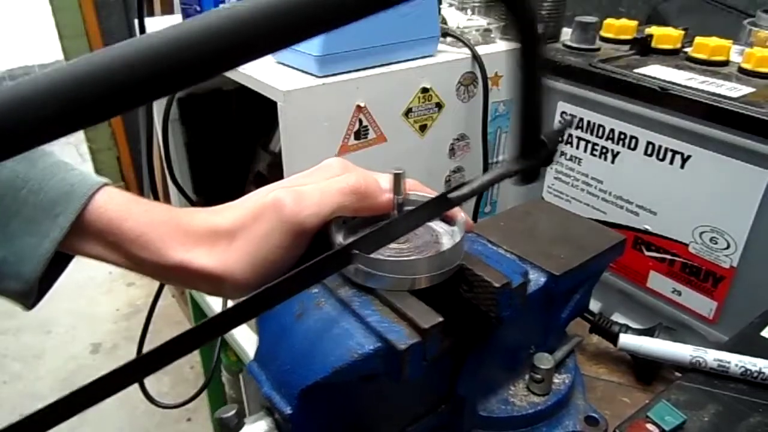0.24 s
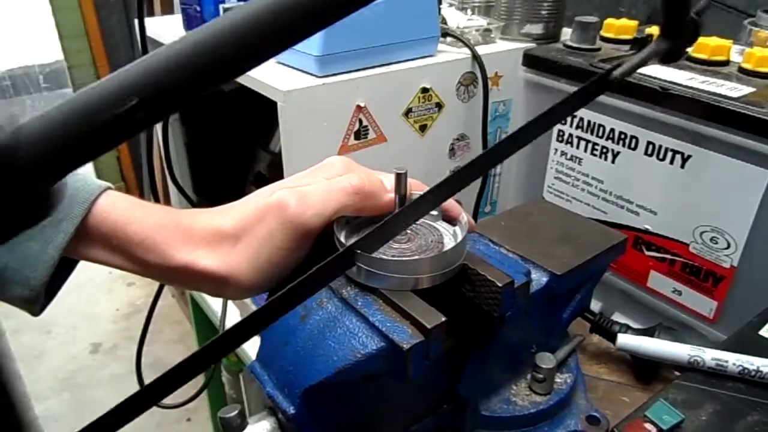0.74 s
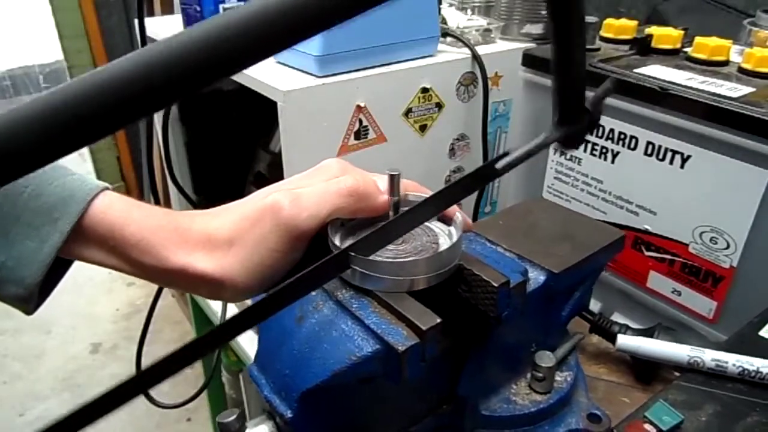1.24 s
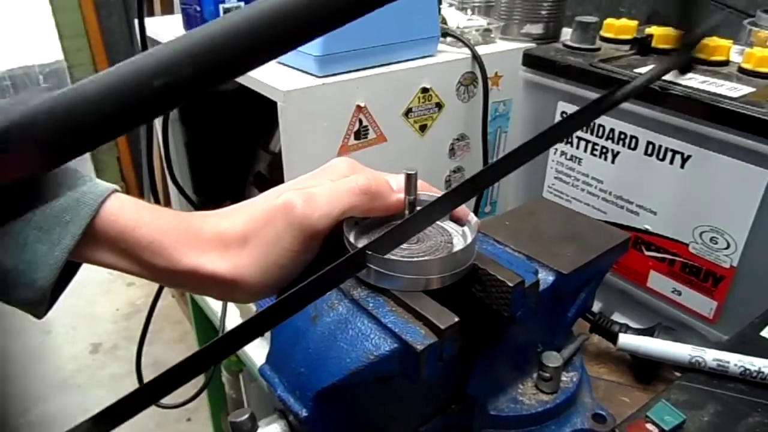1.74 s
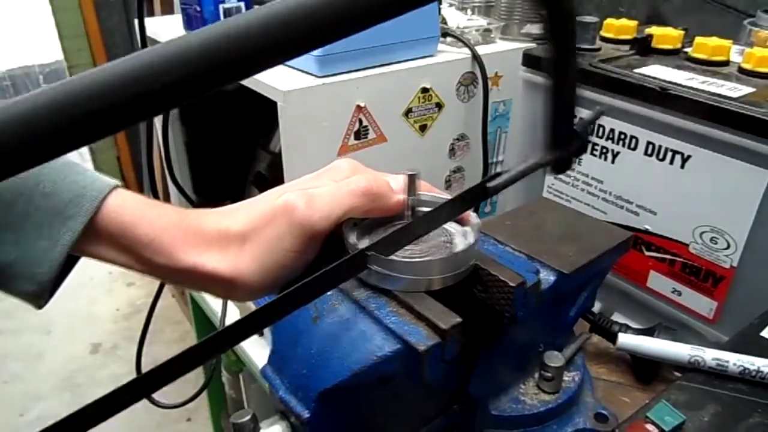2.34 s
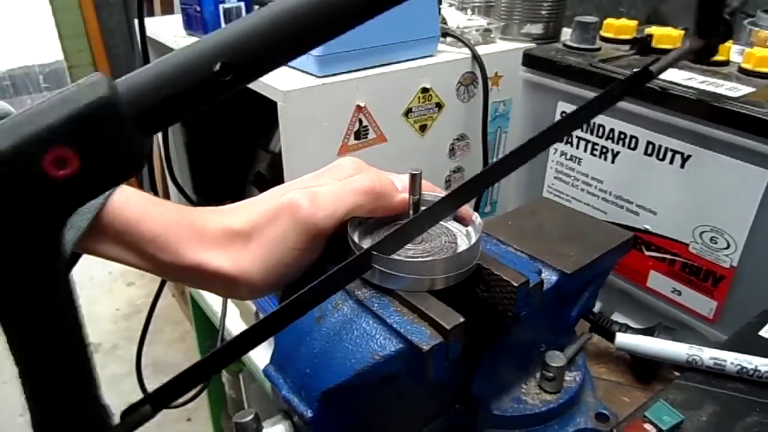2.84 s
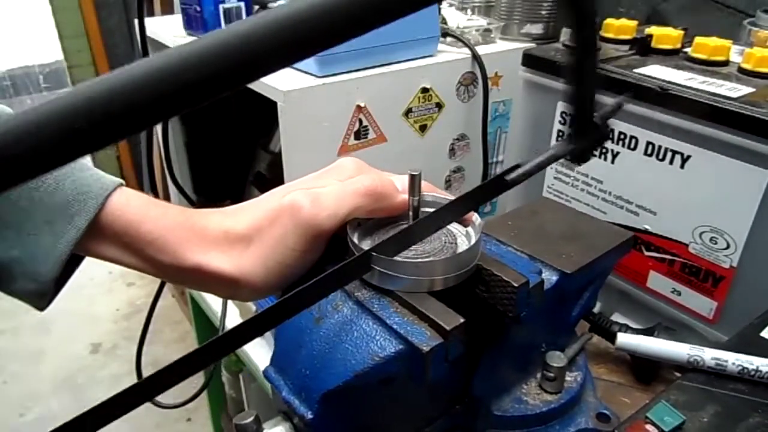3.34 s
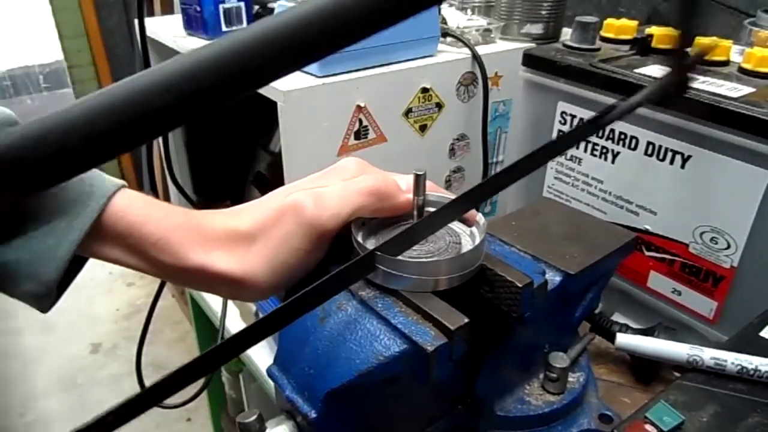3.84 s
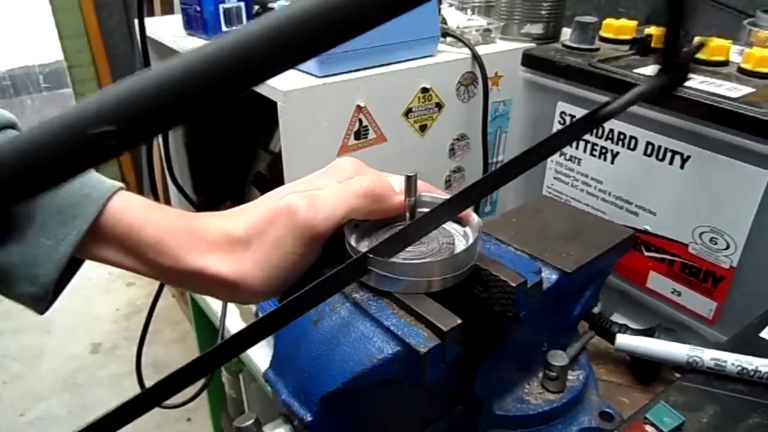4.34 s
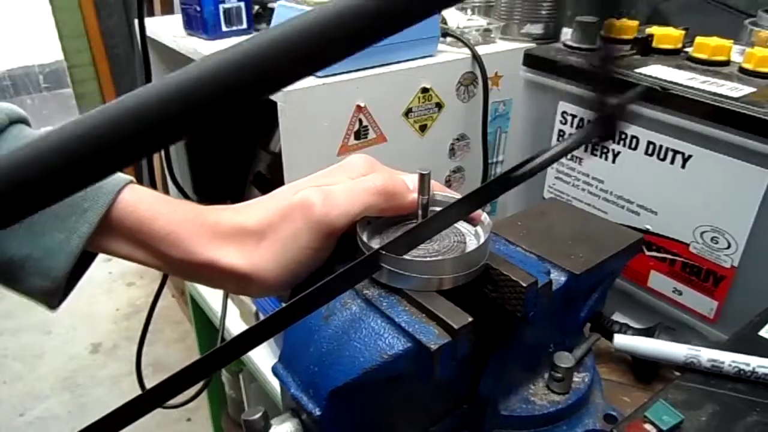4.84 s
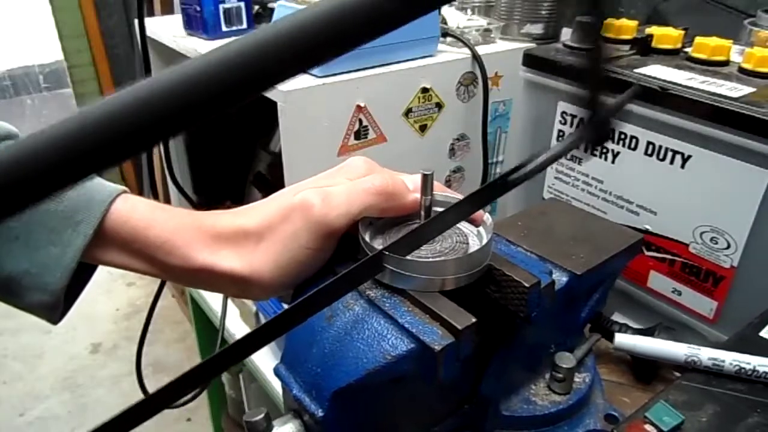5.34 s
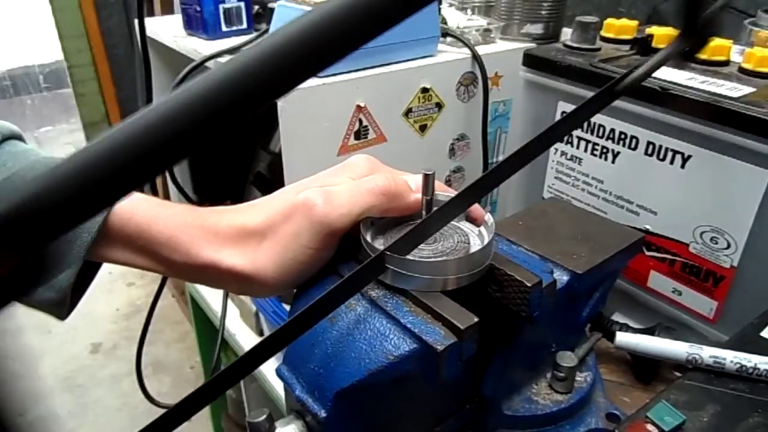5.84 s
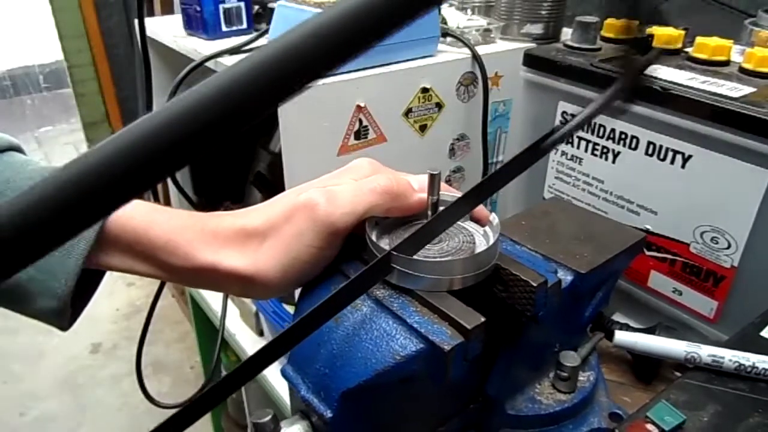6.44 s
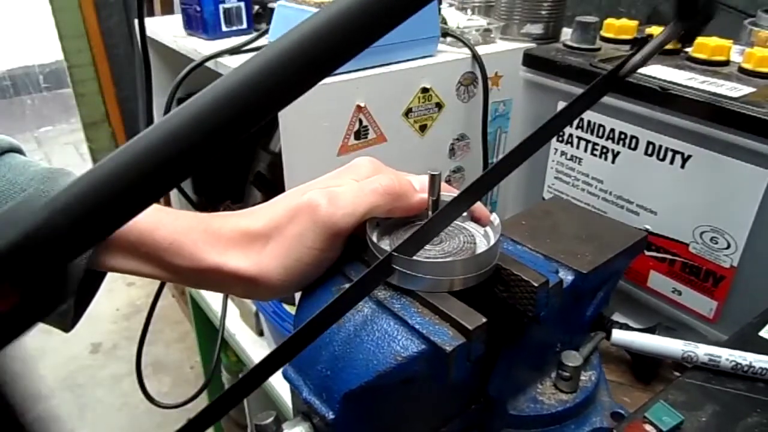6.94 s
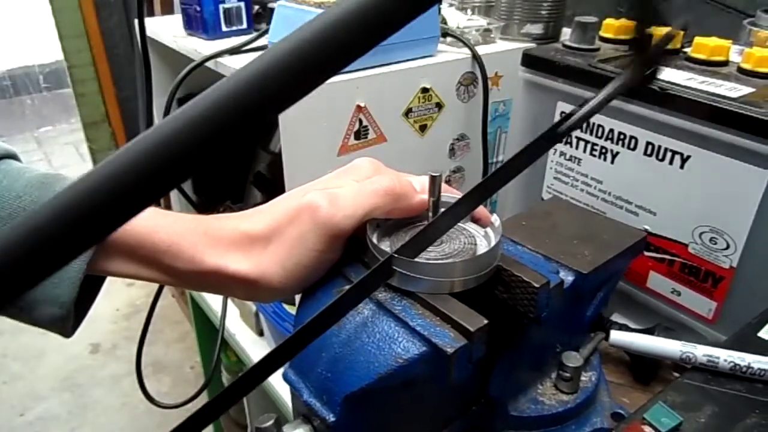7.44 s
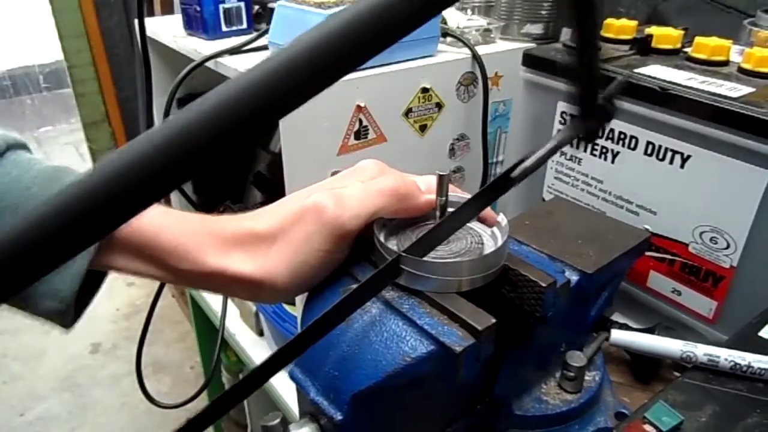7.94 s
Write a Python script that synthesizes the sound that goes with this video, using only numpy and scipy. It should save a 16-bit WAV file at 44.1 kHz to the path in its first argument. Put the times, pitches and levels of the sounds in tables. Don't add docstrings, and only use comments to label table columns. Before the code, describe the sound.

Close, fast hacksawing on steel: gritty alternating strokes, a humming frame, squeaky singing blade and dull vise knocks over a low workshop rumble.

```python
import sys
import numpy as np
from scipy import signal
from scipy.fft import rfft, irfft, next_fast_len
from scipy.io import wavfile
from scipy.ndimage import uniform_filter1d

SR = 44100
rng = np.random.default_rng(int(sys.argv[2]) if len(sys.argv) > 2 else 0)


def put_to_file(sound):
    columns = np.atleast_2d(sound).T
    safe = np.clip(columns, -1, 1)
    whole_steps = np.round(safe * 32767)
    wavfile.write(sys.argv[1], SR, whole_steps.astype(np.int16))


def voltage_ratio(decibels):
    exponent = np.asarray(decibels, float) / 20
    return 10 ** exponent


N = 361179
TIME = np.arange(N) / SR
TEETH_PER_STROKE = 112


def evened(x):
    return x / np.sqrt(np.mean(x ** 2) + 1e-20)


def steadied(x, size, amount=1):
    return x / np.sqrt(uniform_filter1d(x ** 2, size)) ** amount


def coloured(x, points):
    hz, db = np.transpose(points)
    size = next_fast_len(len(x))
    bins = np.fft.rfftfreq(size, 1 / SR)
    gain = voltage_ratio(np.interp(np.log(bins + 1), np.log(hz), db, -100, -100))
    return irfft(rfft(x, size) * gain, size)[:len(x)]


def ring(x, hz, width):
    r = np.exp(-np.pi * width / SR)
    return evened(signal.lfilter([1, 0, -1], [1, -2 * r * np.cos(2 * np.pi * hz / SR), r * r], x))


def resonate(x, hz, width):
    turn = np.exp(2j * np.pi * np.cumsum(hz * np.ones(len(x))) / SR)
    r = np.exp(-np.pi * width / SR)
    smooth = signal.lfilter([1], [1, -r], x * turn.conj())
    return evened((turn * smooth).real)


def wander(hz):
    knots = evened(uniform_filter1d(rng.standard_normal(7000), size=3))
    return np.interp(TIME * hz, np.arange(7000) / 3, knots)


def swells(events):
    t = np.arange(0, N, 64) / SR
    s, db, length = np.transpose(events)[:, :, None]
    bells = voltage_ratio(db) * .5 ** ((2 * (t - s) / length) ** 2)
    return np.interp(TIME, t, np.max(bells, axis=0))


def holds(events):
    t = np.arange(0, N, 64) / SR
    start, length, db, hz = np.transpose(events)[:, :, None]
    middle = start + length / 2
    level = np.max(voltage_ratio(db) * .5 ** (abs(2 * (t - start) / length - 1) ** 5.1 * 2.433), axis=0)
    nearest = np.argmin(abs(t - middle) - length / 2, axis=0)
    pitch = uniform_filter1d(hz[nearest, 0], size=12)
    since = np.clip(t - middle[nearest, 0], -.04, .04)
    return np.interp(TIME, t, level), np.interp(TIME, t, pitch), np.interp(TIME, t, since)


# (turn [s], rasp [dB], strongest push [share of stroke], rasp at the turn [dB],
# blade and drum ring against the rasp [dB])
PULL_STROKES = [(0.0, -21, 0.58, -43.5, -6.5), (0.337, -20, 0.51, -47, -6.5), (0.67, -20, 0.51, -44, -5.5),
                (1.019, -18.5, 0.49, -38, -7), (1.361, -20.5, 0.59, -42.5, -5),
                (1.713, -19, 0.53, -46, -7.5), (2.069, -20, 0.57, -40.5, -6.5), (2.423, -20, 0.59, -48, -6),
                (2.775, -20, 0.61, -40, -6.5), (3.119, -19.5, 0.51, -43, -8), (3.467, -20, 0.59, -43, -6),
                (3.814, -19.5, 0.6, -50, -8), (4.166, -25, 0.57, -45, -6),
                (4.586, -22.5, 0.53, -66.5, -6.5), (5.001, -20.5, 0.45, -62.5, -11.5),
                (5.377, -19.5, 0.54, -45, -10), (5.735, -20.5, 0.49, -43.5, -7.5),
                (6.079, -20, 0.49, -44.5, -8), (6.443, -19.5, 0.52, -44, -7.5), (6.813, -21, 0.65, -45, -5),
                (7.184, -19, 0.56, -46, -13), (7.605, -23, 0.56, -45.5, -6), (7.992, -19, 0.49, -48.5, -14)]
PUSH_STROKES = [(0.172, -20.5, 0.62, -41, 0.5), (0.507, -19.5, 0.59, -47.5, -1.5),
                (0.838, -20.5, 0.49, -45, -2.5), (1.183, -20.0, 0.53, -48, 1.5),
                (1.538, -20.5, 0.59, -49, -2), (1.898, -20, 0.47, -50, -1), (2.252, -20, 0.53, -52.5, 1),
                (2.61, -19, 0.55, -49, 1), (2.956, -18.5, 0.56, -44.5, 0.5), (3.306, -18.5, 0.6, -45.5, -1),
                (3.643, -20, 0.57, -46.5, 2.5), (4.002, -21.5, 0.52, -49, 2.5),
                (4.362, -26.5, 0.61, -53, 4), (4.775, -21, 0.62, -48, 1), (5.186, -20.5, 0.68, -49.5, -1.5),
                (5.566, -20, 0.53, -46, -1.5), (5.913, -19.5, 0.58, -47.5, -3.5),
                (6.267, -19, 0.64, -45.5, -5), (6.634, -20.5, 0.55, -46.5, -3.5),
                (7.011, -20.5, 0.57, -49, -4.5), (7.382, -20, 0.65, -47.5, -5), (7.811, -20, 0.59, -48, -5)]


def strokes():
    return np.array(sorted(PULL_STROKES + PUSH_STROKES))


def along_strokes(values, shares):
    turns = np.append(strokes()[:, 0], N / SR)
    at = turns[:-1, None] + np.diff(turns)[:, None] * shares
    return np.interp(TIME, at.ravel(), np.ravel(values))


def ring_db(follow, arches, shares):
    rows = strokes()
    way = np.arange(len(rows)) % 2
    return along_strokes(follow * rows[:, 4:] + np.array(arches)[way], np.array(shares))


def travel():
    turns = np.append(strokes()[:, 0], N / SR)
    return .5 + .5 * np.cos(np.pi * np.interp(TIME, turns, np.arange(len(turns))))


def pressure_db():
    rows, share = strokes(), np.arange(24) / 24
    length = np.diff(rows[:, 0], append=N / SR)[:, None]
    stroke_db, top, turn_db = rows[:, 1:2], np.clip(rows[:, 2:3], .2, .8), rows[:, 3:4]
    rest = 0.0023 * np.maximum(-39.5 - turn_db, 0)
    late, early = 0.13 * rest / length, 0.87 * np.roll(rest, -1) / length
    moving = np.clip((share - late) / (1 - late - early), 0, 1)
    leaning = moving ** (np.log(.5) / np.log(top))
    arch = voltage_ratio(stroke_db) * abs(np.sin(np.pi * leaning)) ** 1.1
    fade = 410
    creep_db = np.minimum(turn_db + fade * share * length, np.roll(turn_db, -1) + fade * (1 - share) * length)
    creep = voltage_ratio(np.minimum(creep_db, stroke_db - 15))
    return along_strokes(20 * np.log10(np.hypot(arch, creep)), share)


def teeth(place):
    passed = np.cumsum(abs(np.gradient(place)) * (1 + .15 * wander(60)) + 2e-6) * TEETH_PER_STROKE
    count = np.maximum.accumulate(np.floor(passed + .08 * rng.standard_normal(N)))
    bites = (np.diff(count, prepend=0) > 0) * voltage_ratio(3.6 * rng.standard_normal(N))
    busy = np.sqrt(uniform_filter1d(bites ** 2, 900) + 1e-5)
    chips = rng.standard_normal(N)
    clumps = voltage_ratio(1.07 * wander(70) + 0.57 * wander(240))
    return evened((voltage_ratio(-5.5) * bites / busy + chips) * clumps)


# (time [s], level [dB])
BENCH_RUMBLE = [(0.0, -46), (0.98, -46), (1.19, -44.5), (2.12, -46), (3.01, -40.5), (3.65, -39.5),
                (4.08, -42), (4.63, -44), (4.93, -40.5), (5.41, -41), (6.59, -42.5), (8.05, -39.5),
                (8.19, -39)]
# (pitch [Hz], level [dB per Hz])
BENCH_COLOUR = [(12, -34), (25, -8.5), (55, 3.5), (85, 1.5), (167, -5.5), (212, -7), (392, -11.5),
                (600, -12), (780, -35), (1320, -120)]


def rumble(rasp_db):
    s, db = np.transpose(BENCH_RUMBLE)
    noise = evened(coloured(rng.standard_normal(N), BENCH_COLOUR))
    return voltage_ratio(np.interp(TIME, s, db) + 5.5 + 1.9 * wander(7.4) + 0.0095 * (rasp_db + 36)) * noise


# (pitch [Hz], level [dB per Hz])
AIR_COLOUR = [(290, -22), (500, -3.5), (760, -4.5), (917, -0.5), (1460, -10.5), (2600, -13), (15800, -74)]


def air():
    return voltage_ratio(-43.5) * evened(coloured(rng.standard_normal(N), AIR_COLOUR))


# (pitch [Hz], level [dB per Hz])
SCRAPE_COLOUR = [(590, -12), (1000, -14), (1400, -19.5), (1570, -8), (2410, -12), (2770, -2.5),
                 (3290, -8.5), (6450, -6.5), (9020, -12.5), (14200, -4.5), (15900, -26)]
# (pitch [Hz], width [Hz], level [dB])
STEEL_RINGS = [(3630, 120, -12.5), (4445, 85, -9), (5236, 100, -8.5), (6280, 110, -7), (6510, 90, -7.5),
               (6745, 80, -12.5), (8211, 55, -15.5), (5400, 130, -11), (14450, 600, -5)]


def rasp(drive, place, rasp_db):
    z = signal.stft(coloured(drive, SCRAPE_COLOUR), SR, nperseg=512)[2]
    patches = uniform_filter1d(rng.standard_normal(z.shape), 6, 0)
    patches = evened(uniform_filter1d(patches, 5, 1))
    broad = evened(signal.istft(z * voltage_ratio(3 * patches), SR, nperseg=512)[1][:N])
    rings = sum(voltage_ratio(db + 3.7 * wander(8.6)) * ring(drive, hz, width) for hz, width, db in STEEL_RINGS)
    pulling = uniform_filter1d(1. * (np.gradient(place) < 0), size=800)
    return voltage_ratio(rasp_db) * (voltage_ratio(-1) * broad + voltage_ratio(-13.5 + 4 * pulling) * rings)


# (pitch drawn back [Hz], midway [Hz], pushed out [Hz], width [Hz],
# level drawn back [dB], pushed out [dB])
BLADE_RINGS = [(2160, 2170, 2230, 84, 8.5, 1), (2110, 2755, 3060, 105, 23.5, -6),
               (564, 962, 1980, 87, 5.5, 1), (1860, 1880, 1763, 23, -6, -3.5),
               (1390, 1000, 1160, 520, -64, 10), (1650, 5800, 3550, 730, -47, 8.5)]
# (level early [dB], late [dB])
BLADE_ARCHES = [(-2.5, -1.5), (-6.5, -1.5)]


def blade(drive, place, rasp_db):
    out = 0
    for back_hz, mid_hz, out_hz, width, back_db, out_db in BLADE_RINGS:
        hz = np.interp(place, [0, .5, 1], [back_hz, mid_hz, out_hz])
        level = voltage_ratio(back_db + (out_db - back_db) * place + 6.1 * wander(15))
        out = out + level * resonate(drive, hz, width)
    level_db = 1.01 * (rasp_db + 21) - 25.5 + ring_db(1, BLADE_ARCHES, [.3, .7])
    return voltage_ratio(level_db) * steadied(out, 3000)


# (start [s], length [s], level [dB], pitch [Hz])
FRAME_HUMS = [(0.094, 0.041, -29, 906), (0.385, 0.098, -27, 877), (0.565, 0.046, -28, 941),
              (0.725, 0.07, -23, 900), (0.906, 0.055, -30, 894.2), (1.06, 0.065, -17, 880),
              (1.429, 0.085, -24, 888.1), (1.771, 0.067, -26, 885), (1.94, 0.034, -26.5, 893),
              (2.136, 0.11, -21.5, 884), (2.5, 0.04, -28.5, 885), (2.54, 0.048, -23, 891),
              (2.658, 0.047, -27, 902), (2.85, 0.11, -19.5, 878), (3.009, 0.05, -24.5, 893),
              (3.192, 0.048, -21, 887), (3.243, 0.054, -26, 883), (3.389, 0.057, -26.5, 896),
              (3.886, 0.066, -23, 902.1), (4.06, 0.047, -25, 912), (4.29, 0.05, -37, 888),
              (4.408, 0.043, -32, 885), (4.48, 0.052, -33, 890), (4.702, 0.03, -29.5, 874),
              (5.08, 0.029, -25, 899), (5.268, 0.069, -25, 893), (5.474, 0.087, -25.5, 893),
              (5.628, 0.068, -29, 894), (5.801, 0.08, -33, 898), (5.968, 0.04, -30, 890),
              (6.153, 0.055, -26, 886), (6.336, 0.044, -31.5, 902), (6.52, 0.022, -24, 899),
              (6.543, 0.024, -17.5, 925), (6.926, 0.074, -26, 893), (7.079, 0.067, -31, 915),
              (7.23, 0.042, -30, 881), (7.275, 0.033, -18.5, 891), (7.31, 0.052, -25, 889),
              (7.485, 0.055, -22.5, 885), (8.036, 0.038, -29, 881.5), (8.075, 0.11, -24, 886.5)]


def frame(drive, rasp_db):
    burst, pitch, since = holds(FRAME_HUMS)
    burst = burst * voltage_ratio(-50 * since)
    idle = voltage_ratio(-38.5 + 0.53 * (rasp_db + 22) + 2.2 * wander(22))
    hz = 886 + 4 * wander(4.6)
    hz = hz + (pitch - hz) * burst / (burst + idle)
    phase = 2 * np.pi * np.cumsum(hz + 8 * wander(30)) / SR
    hum = np.sqrt(2) * np.sin(phase) * voltage_ratio(1.3 * wander(60))
    shaken = ring(ring(drive, 917, 68), 878, 120)
    return np.hypot(voltage_ratio(-1) * burst, idle) * hum + (voltage_ratio(-11) * burst + voltage_ratio(-3) * idle) * shaken


def tooth_tone(drive, place, rasp_db):
    rate_hz = uniform_filter1d(abs(np.gradient(place)), 400) * SR * TEETH_PER_STROKE
    tone = resonate(resonate(drive, rate_hz, 63), rate_hz, 210)
    return voltage_ratio(rasp_db - 24.5 + 1.6 * wander(9)) * tone * np.clip(rate_hz / 500, 0, 1)


def ring_cluster(drive, modes, level, steady, sway_db):
    out = 0
    for hz, width, db in modes:
        out = out + voltage_ratio(db + sway_db * wander(16)) * ring(ring(drive, hz, width), hz, 4 * width)
    return level * steadied(evened(out), 1200, steady)


# (pitch [Hz], width [Hz], level [dB])
DRUM_RINGS = [(2800, 64, 3.5), (2688, 86, -6.5), (2977, 68, -5.5), (2540, 25, -11.5)]
# (level early [dB], midway [dB], late [dB])
DRUM_ARCHES = [(8, -4, -5), (-9.5, -26, -9.5)]
# (time [s], level [dB], length [s])
DRUM_DIGS = [(0.258, -16.5, 0.05), (0.594, -14.5, 0.04), (0.937, -14, 0.048), (1.273, -16, 0.05),
             (1.613, -16, 0.018), (1.645, -16, 0.03), (1.763, -18, 0.031), (1.972, -18.5, 0.039),
             (2.17, -26, 0.049), (2.345, -18.5, 0.046), (2.703, -32, 0.1), (3.036, -17, 0.035),
             (3.078, -23, 0.06), (3.21, -24, 0.05), (3.369, -28, 0.054), (3.746, -26, 0.022),
             (3.914, -26, 0.03), (4.085, -22, 0.027), (4.896, -23, 0.049), (5.056, -21.5, 0.043),
             (5.297, -13, 0.024), (5.43, -23, 0.02), (5.655, -17, 0.038), (6.013, -19.5, 0.048),
             (6.135, -16, 0.018), (6.16, -20, 0.02), (6.366, -27, 0.037), (6.736, -15.5, 0.031),
             (7.1, -13.5, 0.03), (7.244, -19, 0.039), (7.524, -22, 0.065), (7.897, -22, 0.045),
             (8.094, -23.3, 0.062)]


def drum(drive, place, rasp_db):
    cut = voltage_ratio(rasp_db + ring_db(2.08, DRUM_ARCHES, [.2, .52, .8]))
    hang = voltage_ratio(-52) * place ** 6
    digs = voltage_ratio(-4 + 1.5 * catches_db()) * swells(DRUM_DIGS)
    return ring_cluster(drive, DRUM_RINGS, np.hypot(cut + hang, digs), steady=0.72, sway_db=3.5)


# (pitch [Hz], width [Hz], level [dB])
JAW_RINGS = [(638, 30, -4), (685, 50, 2.5), (450, 40, -20)]
# (time [s], level [dB], length [s])
JAW_SHUDDERS = [(0.185, -34, 0.018), (0.561, -35, 0.03), (0.884, -37.5, 0.059), (1.066, -37, 0.031),
                (1.57, -21, 0.015), (1.658, -34, 0.045), (3.36, -33.5, 0.057), (3.75, -37, 0.032),
                (4.73, -32, 0.054), (5.521, -36, 0.12), (5.617, -29.5, 0.029), (6.331, -31, 0.03),
                (7.047, -37, 0.083), (7.249, -32.5, 0.032), (7.478, -29, 0.034)]


def vise_jaw(drive, rasp_db):
    idle = voltage_ratio(-43 + 0.16 * (rasp_db + 11))
    level = np.hypot(voltage_ratio(3.5) * swells(JAW_SHUDDERS), idle)
    return ring_cluster(drive, JAW_RINGS, level, steady=0.81, sway_db=4)


# (pitch [Hz], time to die by 60 dB [s])
ROOM_DECAY = [(200, 0.22), (1000, 0.15), (4000, 0.12), (12000, 0.02)]


def shop(x):
    hz, t, z = signal.stft(rng.standard_normal(SR // 2), SR, nperseg=256)
    t60 = np.interp(hz, *np.transpose(ROOM_DECAY))
    tail = signal.istft(z * voltage_ratio(-60 * t / t60[:, None]), SR, nperseg=256)[1]
    echo = np.append(np.zeros(300), tail / np.linalg.norm(tail))
    return signal.fftconvolve(x, echo)[:N]


def whistles(drive, events, width, gain_db, climb=0):
    burst, pitch, since = holds(events)
    tone = resonate(drive, pitch + climb * since, width)
    return voltage_ratio(gain_db) * burst * steadied(tone, 900, 0.35)


# (start [s], length [s], level [dB], pitch [Hz])
BLADE_CHIRPS = [(0.068, 0.037, -21, 2230), (0.23, 0.039, -28, 2360), (0.394, 0.044, -25, 2200),
                (0.568, 0.038, -26, 2330), (0.88, 0.063, -25, 2200), (1.081, 0.037, -31, 2240),
                (1.245, 0.038, -32, 2300), (1.58, 0.03, -34, 2230), (1.804, 0.035, -26, 2230),
                (1.931, 0.046, -22, 2290), (2.14, 0.064, -25, 2220), (2.281, 0.043, -30, 2350),
                (2.498, 0.062, -25, 2228), (2.64, 0.05, -23, 2289), (2.873, 0.035, -28, 2207),
                (2.981, 0.044, -23.5, 2351), (3.193, 0.069, -24, 2263), (3.323, 0.033, -26.5, 2260),
                (3.549, 0.047, -25, 2264), (3.677, 0.029, -30, 2420), (3.892, 0.054, -23, 2247),
                (4.046, 0.04, -29, 2355), (4.829, 0.043, -33, 2210), (5.184, 0.024, -38, 2205),
                (5.265, 0.033, -23, 2482), (5.622, 0.041, -24, 2406), (5.966, 0.035, -27, 2359),
                (6.689, 0.058, -21.5, 2340), (7.07, 0.034, -30, 2495), (7.458, 0.048, -24, 2320),
                (7.863, 0.045, -21, 2336), (8.082, 0.037, -30, 2300)]


def chirps(drive, place):
    climb = 3900 * (np.gradient(place) > 0)
    return whistles(drive, BLADE_CHIRPS, 86, -4, climb)


# (place [share of stroke], pitch [Hz], level against the rasp [dB])
PUSH_CLIMB = [(.15, 2170, -28), (.3, 2390, -18), (.45, 2720, -12), (.6, 2800, -18.5), (.75, 2850, -30)]


def climbing_ring(drive, place, rasp_db):
    share, hz, db = np.transpose(PUSH_CLIMB)
    every = np.ones((len(strokes()), 1))
    tone = resonate(drive, along_strokes(every * hz, share), 110)
    pushing = uniform_filter1d(1. * (np.gradient(place) > 0), size=400)
    return pushing * voltage_ratio(rasp_db + along_strokes(every * db, share)) * steadied(tone, 900, 0.49)


# (time [s], peak [dB], brightness [dB], rebound [dB])
VISE_KNOCKS = [(0.1768, -18, 5, -1), (0.5137, -16.5, -1, -13), (1.19, -19, -1, -6),
               (1.5558, -9.5, -1, -5.5), (1.896, -22.5, 0, 3.5), (2.2578, -17.5, 0, -1),
               (2.618, -18, -1, -3), (2.965, -28.5, -13, 2), (3.3088, -20, -5.5, -2),
               (3.648, -27.5, 2.5, -2), (3.736, -29, 2, -4), (3.951, -33.5, 8.5, 5.5), (4.003, -30.5, 2, 1),
               (4.659, -24, 5.5, 2), (5.063, -19, 5, 1), (5.198, -28, -1, -2), (5.908, -25.5, 1, -2),
               (6.2687, -30.5, 8, -4), (6.633, -23, -1, -1.5), (7.015, -18.5, -11, -5.5),
               (7.826, -29, -14, -3), (8.1845, -22.5, 3, -1)]
# (pitch [Hz], level [dB], time to die by 60 dB [s])
WOOD_RINGS = [(96, 3.5, 0.052), (161, 3.5, 0.087), (203, -9, 0.051), (310, -2, 0.012), (369, -0.5, 0.022),
              (533, -11, 0.03)]
METAL_RINGS = [(670, -20, 0.017), (852, -3.5, 0.031), (1240, -11, 0.017), (1400, -7, 0.0092),
               (2240, -10, 0.04), (3500, -18, 0.0044), (5000, -23, 0.0032)]
# (delay [s], level against the rebound [dB])
REBOUNDS = [(.008, 4.5), (0.017, 0.5), (0.024, 1)]


def knocks():
    size = 9000
    t, out = np.arange(size) / SR, np.zeros(N + size)
    modes = WOOD_RINGS + METAL_RINGS
    spread = rng.uniform(-1.1, 1, (len(VISE_KNOCKS), len(modes + REBOUNDS)))
    clatter = ring(rng.standard_normal(N + size), 360, 610)
    late = np.maximum(t - 0.002, 0)
    blow = voltage_ratio(3.5) * np.sin(2 * np.pi * 390 * late) * np.exp(-late / 0.0038)
    for (s, db, bright_db, rebound_db), chance in zip(VISE_KNOCKS, spread):
        rings = []
        for (hz, d, t60), c in zip(modes, chance):
            tone = np.sin(2 * np.pi * hz * (1 + 0.078 * c) * t)
            rings.append(voltage_ratio(d + 2 * c - 60 * t / t60) * tone * (1 - np.exp(-t * hz * 5.9)))
        wood = sum(rings[:len(WOOD_RINGS)]) * (1 - np.exp(-t / 0.003))
        metal = np.interp(t - 0.0018, t, voltage_ratio(bright_db) * sum(rings[len(WOOD_RINGS):]), 0)
        bounces = np.zeros(1500)
        for (delay, d), c in zip(REBOUNDS, chance[::-1]):
            bounces[round((delay + .0015 * c) * SR)] = voltage_ratio(d + rebound_db)
        duller = signal.oaconvolve(0.54 * wood + .5 * blow + 0.48 * metal, bounces)[:size]
        at = round(s * SR)
        loose = clatter[at:at + size] * voltage_ratio(bright_db - 3.5 - 60 * t / 0.078) * np.minimum(t / 0.008, 1)
        out[at:at + size] += voltage_ratio(db + 1) * (blow + 0.57 * wood - metal + loose + duller)
    return out[:N]


# (time [s], peak [dB])
KNOCK_TICKS = [
    (0.1796, -7.5),
    (0.5153, -21),
    (1.1984, -16),
    (1.5609, -22),
    (2.619, -30),
    (2.9763, -21),
    (5.017, -32),
]


def ticks():
    t, out = np.arange(300) / SR, np.zeros(N)
    band = signal.butter(2, [450, 6500], "band", fs=SR)
    for (s, db), noise in zip(KNOCK_TICKS, rng.standard_normal((len(KNOCK_TICKS), 300))):
        click = (0.63 * noise - 1.36 * (t < .00015)) * voltage_ratio(db - 60 * t / 0.015)
        out[round(s * SR):][:300] += signal.lfilter(*band, click) * voltage_ratio(0.5)
    return out


# (start [s], length [s], level [dB], pitch [Hz])
BLADE_SQUEAKS = [(0.283, 0.051, -33, 1290), (0.61, 0.034, -27, 1260), (0.7, 0.038, -28, 1340),
                 (0.95, 0.028, -22, 1270), (1.039, 0.043, -31, 1310), (1.284, 0.027, -26, 1350),
                 (1.433, 0.029, -32, 1300), (1.759, 0.066, -33, 1154), (1.976, 0.057, -31, 1280),
                 (2.319, 0.059, -27, 1244), (2.686, 0.043, -34, 1240), (2.83, 0.043, -28, 1253),
                 (3.035, 0.056, -32, 1196), (3.386, 0.052, -26, 1319), (3.719, 0.035, -31, 1252),
                 (3.854, 0.041, -34, 1210), (4.658, 0.031, -30.5, 1146), (4.883, 0.054, -31, 1277),
                 (5.019, 0.072, -30, 1230), (5.426, 0.031, -31.5, 1320), (5.671, 0.057, -36, 1240),
                 (5.76, 0.028, -32, 1193), (6.01, 0.042, -28, 1204), (6.112, 0.032, -24.5, 1247),
                 (6.373, 0.054, -35, 1307), (6.476, 0.039, -31, 1259), (6.867, 0.031, -31, 1262),
                 (7.11, 0.048, -32, 1350), (8.035, 0.08, -28.5, 1198)]


def squeaks(drive):
    return whistles(drive, BLADE_SQUEAKS, 110, -4.5)


# (start [s], length [s], level [dB], pitch [Hz])
BLADE_SONGS = [(0.293, 0.034, -27, 1620), (0.407, 0.037, -33, 1820), (0.594, 0.065, -28, 1810),
               (1.059, 0.067, -28, 1700), (1.266, 0.068, -27, 1630), (1.611, 0.053, -25, 1668),
               (1.764, 0.073, -29, 1620), (1.99, 0.053, -31, 1583), (3.025, 0.09, -29, 1800),
               (3.397, 0.047, -28, 1720), (3.723, 0.064, -28, 1750), (3.883, 0.047, -26, 1678),
               (4.644, 0.041, -23, 1760), (4.876, 0.088, -25.5, 1738), (5.28, 0.073, -33, 1780),
               (5.656, 0.086, -27, 1695), (5.765, 0.066, -26, 1666), (5.983, 0.075, -25, 1800),
               (6.122, 0.073, -30, 1734), (6.353, 0.084, -21.5, 1642), (6.701, 0.085, -29, 1800),
               (7.097, 0.064, -20, 1640), (7.264, 0.038, -34, 1789), (7.496, 0.065, -23, 1810),
               (7.876, 0.1, -23.5, 1754)]


def songs(drive):
    return whistles(drive, BLADE_SONGS, 170, -9.5)


# (time [s], jump [dB])
TOOTH_CATCHES = [(1.2607, 1.5), (1.733, 3), (1.7589, 4), (1.936, 6.5), (2.797, 9), (3.333, 7), (3.834, 6),
                 (3.881, 3), (4.0704, 2.5), (4.182, 8), (4.609, 5), (5.02, -2), (5.037, 2.5), (5.212, 7),
                 (5.396, 2.5), (5.4273, 4.5), (5.634, 3.5), (6.13, 4), (6.269, 2), (6.6917, 3),
                 (6.711, 4.5), (7.487, 6.5), (8.013, -3)]


def catches_db():
    out = -14 * np.clip((TIME - 8.15) / 0.018, 0, 1)
    t = np.arange(-3000, 3000) / SR
    shape = np.where(t < 0, -1, .6) * np.exp(-abs(t) / .015)
    for s, db in TOOTH_CATCHES:
        at = round(s * SR)
        out[at - 3000:at + 3000] += db * shape
    return out


def scene():
    place = travel()
    drive = teeth(place)
    rasp_db = uniform_filter1d(pressure_db(), 400) + catches_db() + 1.74
    near = rasp(drive, place, rasp_db) + blade(drive, place, rasp_db) + frame(drive, rasp_db)
    near += tooth_tone(drive, place, rasp_db)
    near += drum(drive, place, rasp_db) + vise_jaw(drive, rasp_db)
    near += chirps(drive, place) + climbing_ring(drive, place, rasp_db)
    near += knocks() + ticks()
    near += squeaks(drive) + songs(drive)
    return (near + voltage_ratio(-14) * shop(near) + rumble(rasp_db) + air())[None]


def low_pass(x):
    return signal.sosfilt(signal.butter(12, 16170, fs=SR, output="sos"), x)


def record(dry):
    edge = signal.firwin(511, 16000, window=("kaiser", 9), fs=SR)[None]
    overloaded = np.tanh(dry * 0.75) / 0.86
    return low_pass(signal.oaconvolve(overloaded, edge, "same"))


dry = scene()
out = record(dry)
put_to_file(out)
```